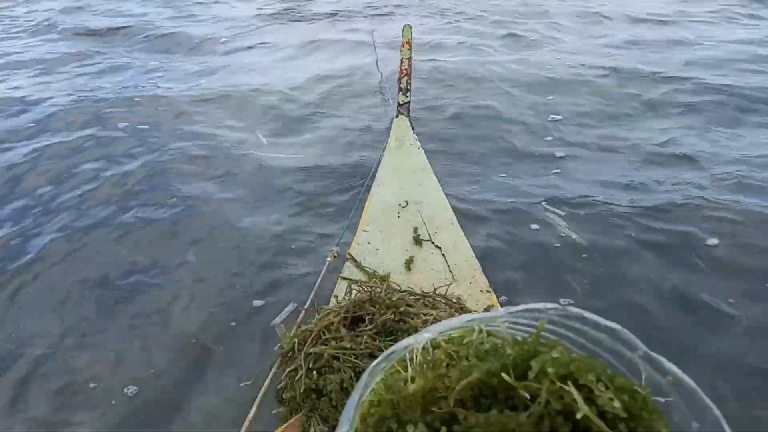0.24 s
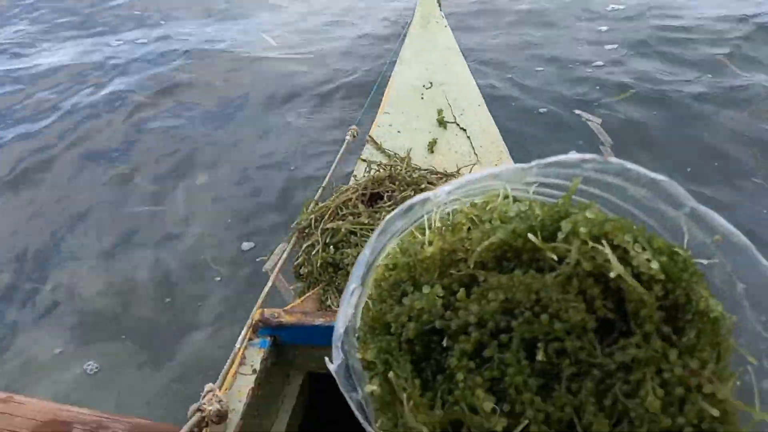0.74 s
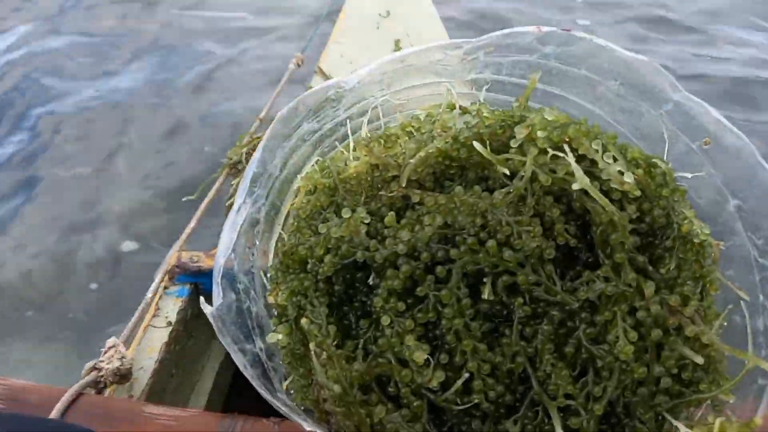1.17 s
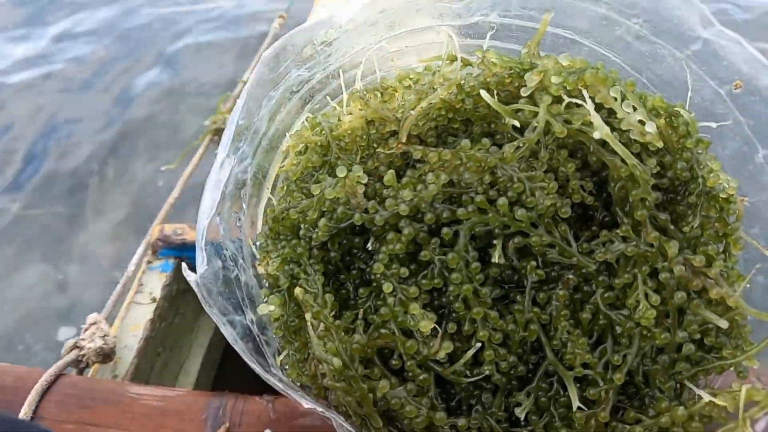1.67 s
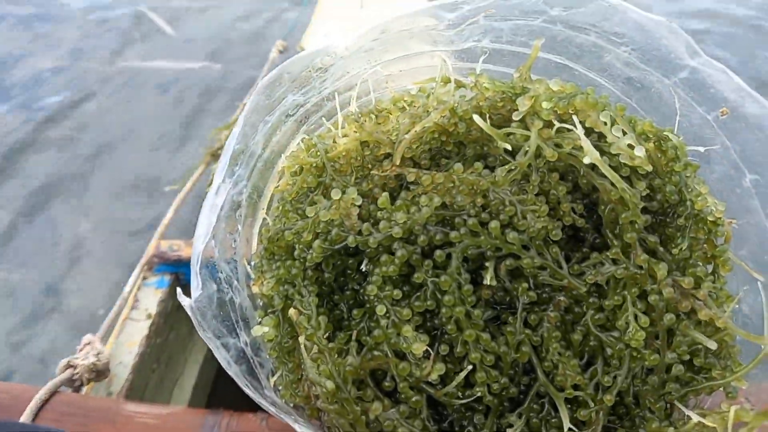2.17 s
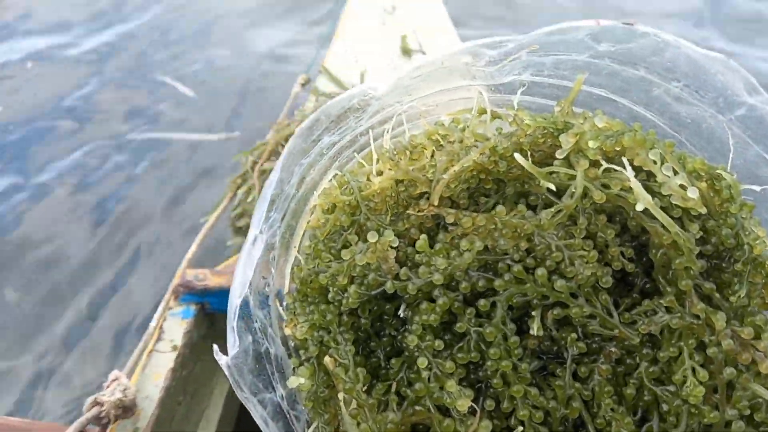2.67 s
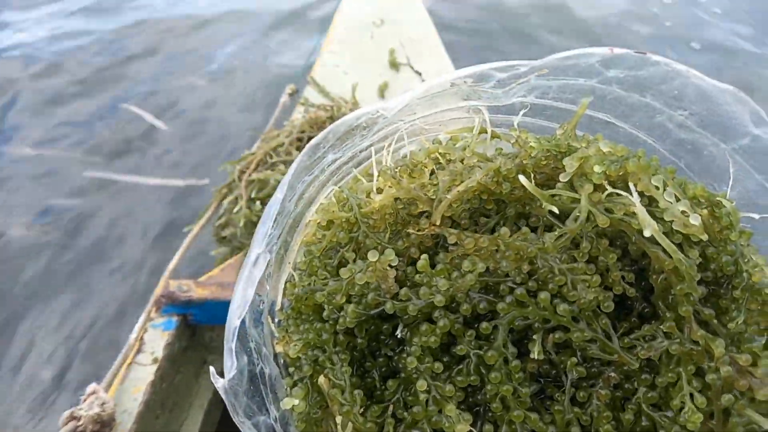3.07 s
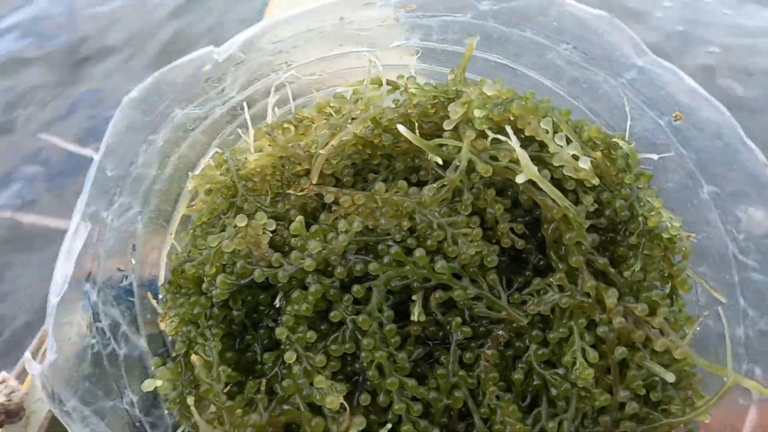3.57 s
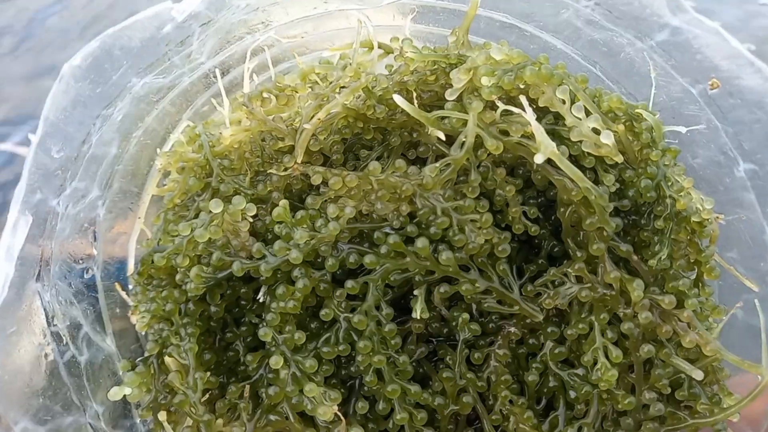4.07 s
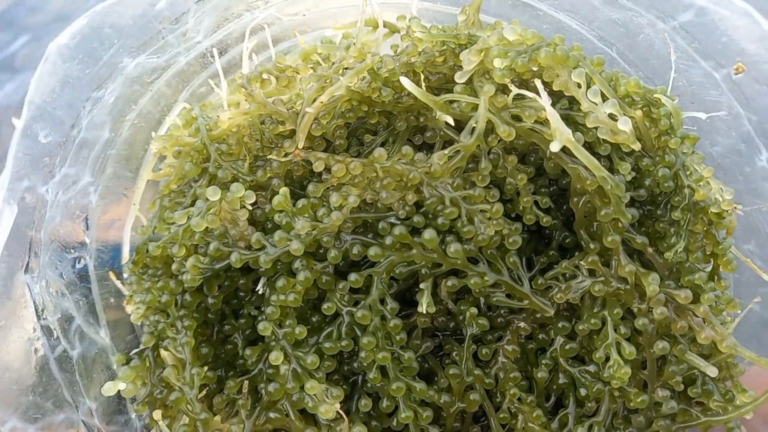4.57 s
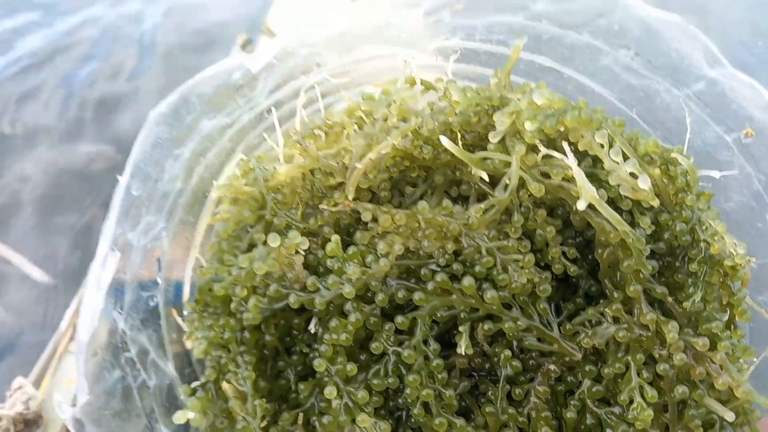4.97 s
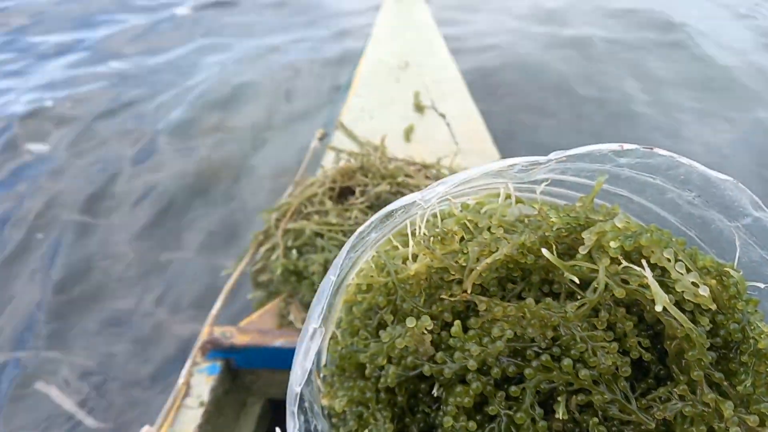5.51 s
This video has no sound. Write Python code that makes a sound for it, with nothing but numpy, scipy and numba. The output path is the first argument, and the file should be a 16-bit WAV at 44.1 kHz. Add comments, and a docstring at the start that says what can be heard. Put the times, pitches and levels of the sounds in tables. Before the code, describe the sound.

Bubbly lapping, sharp little drips and hollow gulps of water against a wooden boat, under irregular rumbling wind buffets on open sea.

```python
"""A small wooden boat on a breezy sea, heard by two microphones. From the start gusts buffet them, as shaped noise
that at times meets their limit, over a fine fizz of breaking water: hiss and crackling patches of tiny bubbles.
Trapped air rings as bubbles, each a short swelling sine, some climbing in pitch; sharp low puffs of wind join in.
Later wavelets slap the hull, as crowds of such sines, and a few hollow, wavering notes swell and stop."""
import sys
import numpy as np
from scipy import signal
from scipy.fft import rfft, irfft, next_fast_len
from scipy.io import wavfile
from scipy.ndimage import uniform_filter1d, minimum_filter1d
from numba import njit

SR = 44100
rng = np.random.default_rng(int(sys.argv[2]) if len(sys.argv) > 2 else 0)


def int16_out(signal):
    """Quantize to a 16-bit WAV file."""
    q = np.round(np.clip(np.atleast_2d(signal).T, -1, 1) * 32767)
    wavfile.write(sys.argv[1], SR, q.astype(np.int16))


def decibels_to_gain(level_db):
    """Convert a level in decibels to a linear amplitude gain (20 dB per decade)."""
    exponent = np.asarray(level_db, float) / 20
    return 10 ** exponent


N = 253354  # length in samples
T = np.arange(N) / SR  # time in seconds
SPACING_S = 20 / SR  # time sound takes from one microphone to the other


def colour(x, points, mirror="even"):
    """Filter by a response of (Hz, dB) points; the ends are mirrored so that they do not click."""
    hz, db = np.transpose(points)
    size = next_fast_len(N + 4096)
    f = np.arange(size // 2 + 1) * SR / size + 1
    padded = np.pad(x, [(0, 0), (2048, size - N - 2048)], "reflect", reflect_type=mirror)
    response = decibels_to_gain(np.interp(np.log(f), np.log(hz), db))
    return irfft(rfft(padded) * response, size)[:, 2048:N + 2048]


def unit(x):
    """Scale to rms 1."""
    return x / np.sqrt(np.mean(x ** 2))


def walk(rate):
    """Smoothly wandering random levels for each side, with about `rate` new values a second; spread near 1."""
    k = int(SR / rate)
    held = np.repeat(rng.standard_normal((2, N // k + 1)), k, axis=1)
    smooth = uniform_filter1d(uniform_filter1d(held, k), k)
    return 1.3 * smooth[:, :N]


def add(out, s, sound):
    """Mix a two-channel sound in at time s."""
    i = max(int(s * SR), 0)
    out[:, i:i + sound.shape[1]] += sound[:, :N - i]


@njit
def ring(s, size, hz, tau, place, glide, shade, blunt):
    """Sines that swell for tau seconds and die; the far microphone hears each later, and weaker the higher it is."""
    out = np.zeros((2, N))
    for e in range(len(s)):
        for c in range(2):
            far = place[e] * (1 - 2 * c)  # a place above 0 is to the right, so far from the left side
            start = s[e] + .5 * far * SPACING_S
            gain = size[e] * np.exp(-shade * far * hz[e] / 6000)
            first = int(start * SR) + 1
            for i in range(max(first, 0), min(first + int(9 * tau[e] * SR), N)):
                t = i / SR - start
                age = t / tau[e]
                swell = (age * np.exp(1 - age)) ** blunt
                out[c, i] += gain * swell * np.sin(2 * np.pi * hz[e] * t * (1 + glide[e] * age))
    return out


def froth(s, db, hz, chance, cycles=10.0):
    """Small bubbles, mostly to the right; most burst in a cycle or two, some ring on, a few are much louder."""
    size = decibels_to_gain(db - 2.28 * np.log(1 - chance[0]))
    tau = np.minimum((.6 + cycles * chance[1] ** 3) / hz, .005)
    place = 1.15 - 0.56 * chance[2] ** 2
    return ring(s, size, hz, tau, place, 0.0051 + 0 * s, 0.58, 1.)


def wind():
    """Turbulence swells and comes in short buffets, partly shared by the sides; flutter rides on the same eddies."""
    # Slower rise and fall of the breeze, with its lulls. Each row: time in seconds, level in dB.
    breeze_levels = [(0, -19), (.5, -36.5), (.75, -16.5), (1.45, -23.5), (1.7, -15), (2.0, -24.5),
                     (2.2, -12.5), (2.4, -35.5), (2.65, -22), (2.96, -38.5), (3.35, -23.5), (3.46, -78),
                     (3.6, -33.5), (4.32, -28.5), (4.6, -16), (4.9, -19.5), (5.03, -44.5), (5.2, -16.5),
                     (5.47, -43.5), (5.74, -14)]
    # Strongest buffets of wind. Each row: time of the peak in seconds, left level in dB, right level in dB.
    buffet_rows = [(0.106, -9.5, -14), (0.274, -18, -16), (0.874, -6.5, -0.5), (1.12, -18.5, -6),
                   (1.286, -2, -5.5), (1.82, -15.5, -14), (2.066, -15.5, -6), (2.132, -5.5, -10.5),
                   (2.592, -11, -7), (2.734, -30, -16.5), (3.171, -25.5, -19), (3.576, -13, -7.5),
                   (3.99, -23, -17), (4.086, -10.5, -14), (4.446, -21, -8), (4.812, -6.5, -44),
                   (4.895, -12, -8), (5.267, -4, -3.5), (5.712, -12, -10)]
    # Tone of the low rumble. Each row: frequency in Hz, response in dB.
    rumble_tone = [(25, -16), (50, -14), (78, 10), (120, 1.5), (200, -10.5), (1000, -69)]
    # Tone of the higher flutter. Each row: frequency in Hz, response in dB.
    flutter_tone = [(120, -27), (220, 1), (310, 8), (450, -9.5), (2000, -72)]
    buffet_s = 0.024  # from the peak until the power is down to 1/e

    power = decibels_to_gain(2 * np.interp(T, *np.transpose(breeze_levels)))
    for s, *db in buffet_rows:
        bump = np.exp(-((T - s) / buffet_s) ** 2)
        power = power + decibels_to_gain(2 * np.array(db))[:, None] * bump

    eddies = walk(21)
    eddies = eddies + .5 * eddies[::-1]  # large eddies reach both sides

    rumble = colour(rng.standard_normal((2, N)), rumble_tone)
    # within one buffet the swings are of much the same size
    evened = rumble / uniform_filter1d(rumble ** 2, size=1600) ** .4
    rumble = unit(evened * decibels_to_gain(5.5 * eddies))

    noise = rng.standard_normal((2, N)) + 0.67 * rng.standard_normal(N)  # partly the same on both sides
    flutter = unit(colour(noise * decibels_to_gain(2 * eddies + 5 * walk(45)), flutter_tone))
    # the flutter grows more slowly with the gust than the rumble does
    return np.sqrt(power) * rumble + decibels_to_gain(-19.5) * power ** 0.38 * flutter


def fizz():
    """Patches of foam, each a quick crackle of small bubbles, burst over the sea's hiss; both rise with the surge."""
    # How hard the water works around the hull. Each row: time in seconds, level in dB.
    surge_levels = [(0, -57), (1.47, -51), (1.8, -53.5), (2.27, -43.5), (2.4, -52.5), (3.1, -56.5),
                    (3.64, -64), (4.1, -49.5), (4.4, -55.5), (5.74, -51.5)]
    # Tone of the sea's hiss. Each row: frequency in Hz, response in dB.
    sea_tone = [(400, -1.5), (600, -16.5), (1000, -18.5), (3400, -29)]
    patches, patch_bubbles, patch_s = 260, 14, 0.013  # count, bubbles in each, longest spread in seconds

    when, pitch, strength = np.repeat(rng.random((patches, 3)), patch_bubbles, axis=0).T
    chance = rng.random((len(when), 5)).T
    hz = 1500 * 6 ** pitch ** 0.4 * (.7 + 0.617 * chance[3])
    surge_db = np.interp(T, *np.transpose(surge_levels))
    db = surge_db[(when * N).astype(int)] - 7.5 - 2.07 * np.log(1 - strength)
    start = when * N / SR + patch_s * chance[4] ** 2
    crackle = froth(start, db, hz, chance)

    hiss_db = 1.0 * walk(24) + 0.85 * (surge_db - surge_db.mean())
    hiss = colour(rng.standard_normal((2, N)), sea_tone) * decibels_to_gain(hiss_db)
    return crackle + hiss * decibels_to_gain(-29.0)


def varied_bubbles():
    """Bubbles with swell times of their own; some climb in pitch, and the higher ones sit further right."""
    # Each row: start in seconds, peak level in dB, starting pitch in Hz, swell time in ms, climb (0 is none).
    varied_rows = [(.072, -38, 700, 14, 0.07), (1.468, -21.5, 619, 10.5, 0), (2.163, -14.5, 541, 3.1, 0.05),
                   (2.874, -9, 937, 5.4, 0.01), (4.586, -42.5, 560, 7.6, 0.18),
                   (5.3239, -6, 1580, 1.15, 0.04), (5.653, -16.5, 950, 6, 0.03)]
    s, db, hz, ms, climb = np.transpose(varied_rows)
    place = np.where(hz > 850, 1.15, 0.4)
    return ring(s, decibels_to_gain(db), hz, ms / 1000, place, climb, 0.84, 1.66)


def bubbles():
    """Small bubbles die sooner; each has a weaker neighbour of another size, a moment later, that beats against it."""
    # The clearest bubbles, from wavelets and falling drops.
    # Each row: start in seconds, peak level in dB, pitch in Hz.
    bubble_rows = [(0.362, -20.5, 2910), (0.362, -38.5, 2030), (0.514, -36, 6840), (0.586, -43.5, 1900),
                   (0.711, -21, 4420), (0.72, -40, 1050), (0.88, -23, 5940), (0.977, -40.5, 1400),
                   (1.274, -26.5, 6070), (1.332, -44, 745), (1.386, -37, 1184), (1.426, -15.5, 2946),
                   (1.46, -19, 1610), (1.47, -22.5, 1460), (1.573, -11, 1752), (1.601, -24.5, 1547),
                   (1.65, -12.5, 1620), (1.824, -32, 862), (1.835, -26.5, 3080), (2.067, -24, 5680),
                   (2.123, -34, 2170), (2.221, -28.5, 900), (2.267, -23.5, 824), (2.276, -28.5, 1700),
                   (2.32, -30.5, 2490), (2.33, -39, 860), (2.426, -39.5, 1402), (2.522, -39.5, 1276),
                   (2.64, -40.5, 2250), (2.651, -38.5, 1260), (2.692, -24.5, 1274), (2.701, -34, 2290),
                   (2.733, -17, 3510), (2.747, -35, 1240), (2.753, -31.5, 2880), (2.775, -36.5, 1540),
                   (2.854, -39, 2030), (2.963, -45, 940), (3.075, -37.5, 1420), (4.169, -30.5, 1540),
                   (4.189, -24, 6350), (4.613, -24, 2160), (5.052, -31, 6370), (5.326, -13.5, 1536),
                   (5.3354, -13, 2310), (5.356, -38, 2020), (5.519, -38, 1660), (5.621, -24, 1570),
                   (5.628, -21, 3980), (5.675, -28, 1705), (5.717, -26, 1705)]
    s, db, hz = np.transpose(bubble_rows)
    chance = rng.random((len(s), 2)).T
    tau = 0.0049 * (1000 / hz) ** 1.2  # swell time in seconds: 4.9 ms at 1 kHz
    place = np.where(hz > 1400, 1.023, -0.039)  # small bubbles to the right, large ones near the middle
    glide = -0.008 + 0 * s  # the pitch sags slightly
    first = ring(s, decibels_to_gain(db), hz, tau, place, glide, 0.58, 1.16)

    later_s = s + tau * (1.4 + 1.8 * chance[0])
    later_hz = hz * (.88 + 0.16 * chance[1])
    later = ring(later_s, decibels_to_gain(db - 9.5), later_hz, tau, place, glide, 1.0, 1.8)
    return first + later


def puffs():
    """Each sharp puff of wind is a short push on the membranes that rings out low, at 330 Hz."""
    # Each row: start in seconds, peak level in dB.
    puff_rows = [(1.263, -10.5), (2.608, -6.5), (4.698, -17), (4.791, -11.5)]
    s, db = np.transpose(puff_rows)
    one = np.ones(len(s))
    return ring(s, decibels_to_gain(db), 330 * one, 0.0013 * one, 0 * one, -.03 * one, 0., 0.42)


def slaps():
    """Each splash traps a crowd of bubbles of many sizes, dense at first, then thinning; the briefest only click."""
    # Each row: start in seconds, rough length in ms, level in dB, typical bubble pitch in Hz.
    slap_rows = [(1.445, 39, -21.5, 3555), (1.468, 36.3, -11.5, 343.6), (1.5, 150, -24, 3800),
                 (2.06, 82, -33, 4420), (2.148, 25, -14, 2557), (2.1615, 2.4, -9, 4530),
                 (2.178, 38.6, -13.5, 281), (2.21, 98, -23.5, 4940), (2.398, 32, -35.5, 5380),
                 (2.55, 51, -25.5, 10520), (2.56, 99, -22, 388.5), (2.63, 150, -31.5, 2640),
                 (3.53, 45, -16, 235.7), (3.865, 38, -40.5, 5170), (4.0, 217, -32, 4950),
                 (4.615, 70, -30, 1188), (5.324, 1.68, -18.5, 4720), (5.3345, 2.3, -18.5, 3530),
                 (5.334, 40.6, -16.5, 563), (5.516, 2.8, -24.5, 5300), (5.596, 1.63, -28, 1360)]
    crowd = 110  # bubbles in a splash
    s, ms, db, hz = np.repeat(slap_rows, crowd, axis=0).T
    chance = rng.random((len(s), 7)).T
    size_spread = 2 ** (1.313 * (chance[3] + chance[4] - 1))
    bubble_hz = np.minimum(hz * size_spread, .36 * SR)
    age = 0.35 * chance[5] + chance[6] ** 2
    bubble_db = db - 10 * np.log10(crowd)  # the crowd shares the splash's power
    return froth(s + ms / 1000 * age, bubble_db, bubble_hz, chance, np.minimum(ms / 3, 11))


def hoots():
    """Hollow, wavering notes that swell and stop, with a patchy octave, a little to the left."""
    # Each row: start in seconds, length in seconds, level in dB, pitch in Hz.
    hoot_rows = [(1.848, 0.1, -28, 622.6), (2.472, 0.082, -31.5, 622), (5.411, 0.053, -40, 893)]
    out = np.zeros((2, N))
    t = np.arange(8192) / SR
    for s, length, db, hz in hoot_rows:
        waver, patchy = walk(43)[:, :len(t)]
        stop = np.exp(-np.maximum(t - length, 0) / 0.003)
        swell = np.clip(0.38 + 0.5 * t / length, 0, 1) * stop
        delay = np.array([[0], [SPACING_S / 3]])  # the right side hears it later
        phase = 2 * np.pi * hz * (np.cumsum(1 + 0.022 * waver) / SR - delay)
        note = np.sin(phase) + decibels_to_gain(-26.5 + 12 * patchy) * np.sin(2 * phase)
        side_gain = decibels_to_gain(db + np.array([[2], [-2]]))
        add(out, s, note * swell * np.minimum(t / .015, 1) * side_gain)
    return out * decibels_to_gain(4.0 * walk(90)[0])  # unsteady loudness


def hull(x, t60=0.11, wet_db=-38):
    """The open hull and water surface give back a short diffuse tail: noise that falls 60 dB in t60 seconds."""
    t = np.arange(6000) / SR
    decay = np.exp(-np.log(1000) * t / t60)
    tail = rng.standard_normal((2, len(t))) * decay * np.minimum(t / 0.0019, 1)
    return x + decibels_to_gain(wet_db) * signal.fftconvolve(x, tail, axes=1)[:, :N]


def scene():
    """Water sounds in the hull, then the wind that reaches the microphones directly."""
    water = fizz() + varied_bubbles() + bubbles() + slaps() + hoots()
    return hull(water) + wind() + puffs()


def band_limit(x):
    """A steep low-pass at the top of the band."""
    return signal.sosfilt(signal.butter(12, 16480, fs=SR, output="sos"), x)


def record(dry):
    """A port resonance, a drop above it and a second peak near the top; a quick limiter holds the gusts."""
    # Tone of the microphones. Each row: frequency in Hz, response in dB.
    microphone_tone = [(5000, 5), (6400, 9.5), (6900, 6), (7500, -11.5), (13600, -8), (15100, 3.5),
                       (16200, -1.5), (16800, -58.5)]
    x = colour(dry, microphone_tone, "odd") * signal.windows.tukey(N, .003)  # soft ends
    limit = 1.03
    gain = minimum_filter1d(limit / np.maximum(np.abs(x), limit), size=300)
    smooth_gain = uniform_filter1d(gain, size=300)
    mix = np.clip(x * smooth_gain, -1, 1)
    return band_limit(mix)


dry = scene()
out = record(dry)
int16_out(out)
```